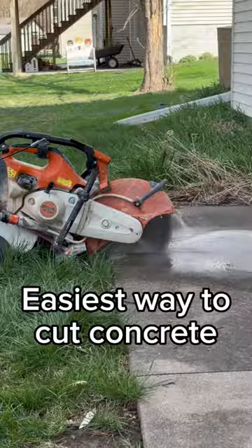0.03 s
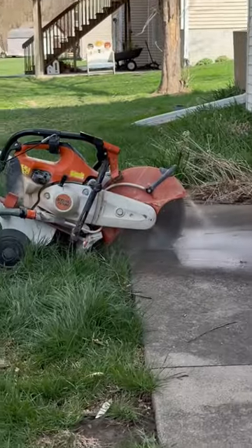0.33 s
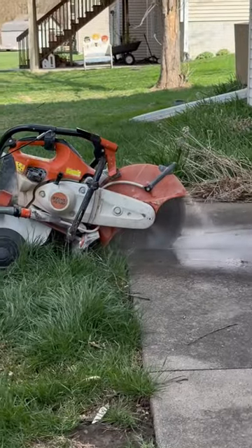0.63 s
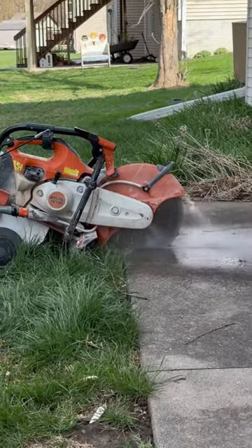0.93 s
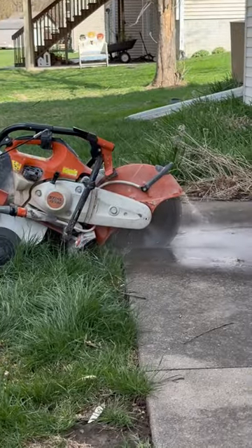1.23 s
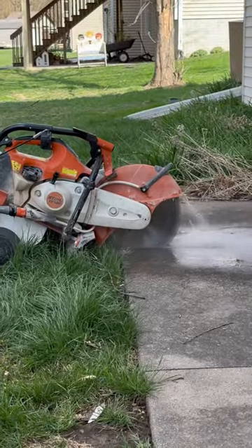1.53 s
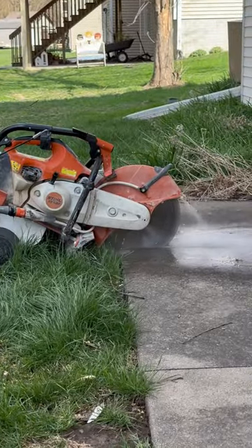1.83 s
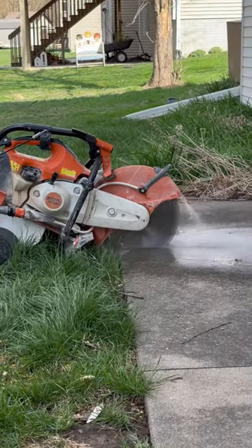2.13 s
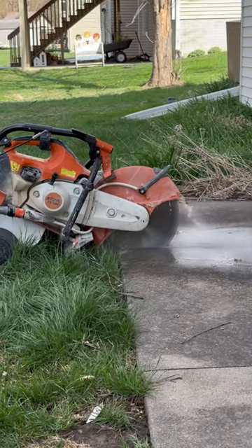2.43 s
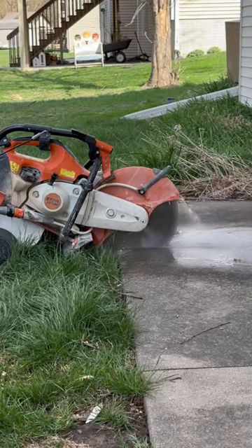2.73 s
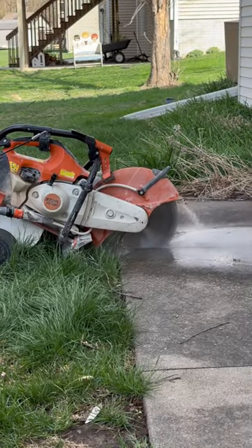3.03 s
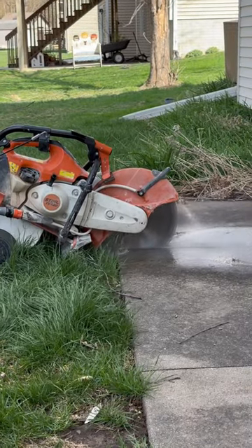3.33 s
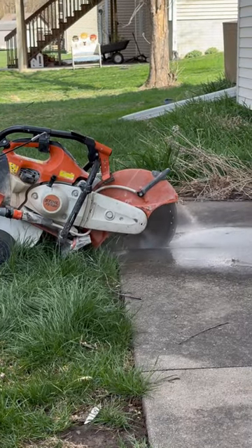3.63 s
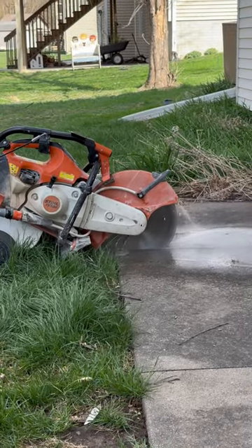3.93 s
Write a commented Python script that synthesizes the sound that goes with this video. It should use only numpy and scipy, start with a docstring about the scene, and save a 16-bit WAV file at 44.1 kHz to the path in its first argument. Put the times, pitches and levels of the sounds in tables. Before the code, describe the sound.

Close by, a buzzing petrol saw cuts concrete with a shrill metallic whistle and hissing water.

```python
"""A petrol cut-off saw cuts a wet concrete path at full throttle, outdoors and close by.
From the start the two-stroke engine buzzes and rasps, the blade grinds through the stone, its steel
disc rings, and water and slurry hiss off it. After about a second the blade bites harder: the disc
squeals and the engine sags a little. Later a whistle from the rubbing disc grows stronger.
A light wind nudges the microphone, hardest near the end."""
import sys
import numpy as np
from scipy import signal
from scipy.fft import rfft, irfft
from scipy.io import wavfile
from scipy.ndimage import uniform_filter1d

SR = 44100
rng = np.random.default_rng(int(sys.argv[2]) if len(sys.argv) > 2 else 0)


def output_pcm(signal):
    """Save a mono or channel-first signal as 16-bit PCM at the path in sys.argv[1].

    Samples are clipped to [-1, 1] before scaling.
    """
    pcm = np.clip(np.atleast_2d(signal).T, -1, 1) * 32767
    wavfile.write(sys.argv[1], SR, np.round(pcm).astype(np.int16))


N = 176400
T = np.arange(N) / SR
HZ = np.fft.rfftfreq(N, 1 / SR)


def engine_buzz(firing_hz, turns):
    """The engine fires once a turn, making wavering tones at multiples of that rate."""
    # Engine tones; each grows or fades as the speed slides it over a resonance:
    # multiple, level_db, left_minus_right_db, change_db_per_hz
    tones = [(1, -39.5, 3, 0.5), (2, -46.5, 9, 1.5), (3, -48, 9.5, .5), (4, -41.2, 12.5, -1),
             (5, -44.2, 9, 1), (6, -43, 5, -2), (7, -50.5, 5, -1), (8, -52.5, 10, 1), (9, -48.5, 1.5, 5),
             (10, -58, 0, 8), (11, -52.5, -0.5, -5), (12, -43.7, 0, -2.5), (13, -55, 0, 9.5)]
    buzz = np.zeros((2, N))
    for multiple, level_db, side_db, db_per_hz in tones:
        tone = np.sqrt(2) * np.cos(2 * np.pi * (multiple * turns + rng.random()))
        waver_db = 0.9 * min(multiple / 4, 1) * wander(16)
        resonance_db = db_per_hz * (firing_hz - firing_hz.mean())
        pan = amp([[side_db / 2], [-side_db / 2]])
        buzz += pan * amp(level_db + waver_db + resonance_db) * tone
    return buzz


def exhaust_rasp(turns):
    """Every firing sends an uneven puff of gas through the muffler."""
    # The rasp that the muffler lets out: pitch_hz, level_db (per Hz)
    muffler = [(30, -110), (125, -80), (200, -70), (222, -69.5), (242, -66.5), (265, -70.5), (360, -72.5),
               (412, -62.5), (438, -68.5), (465, -54), (515, -62.5), (610, -57.5), (680, -54.5), (735, -63),
               (795, -62.5), (862, -57.5), (900, -67), (960, -70), (1200, -77), (1310, -63), (1420, -86),
               (1530, -70.5), (1650, -78.5), (2100, -71), (3500, -109)]
    # The exhaust lies to the left: pitch_hz, right_level_db, left_right_likeness (0 to 1)
    placement = [(150, -2, .95), (300, -6, .94), (430, -4.5, .92), (600, -11, .9), (780, -5, .92),
                 (950, -3, .88), (1300, -1.5, .9), (1700, 0, 1)]
    spread_db, decay_turns, steady_flow, makeup_share = 1.1, 0.26, 0.42, 0.53
    strength = amp(spread_db * rng.standard_normal(1000))[turns.astype(int) % 1000]
    flow = steady_flow + strength * np.exp(-(turns % 1) / decay_turns)
    gas = flow * rng.standard_normal((2, N))
    # Each puff partly makes up for the one before, which clears the rasp around each engine tone.
    puffs = np.array([side - makeup_share * np.interp(turns - 1, turns, side) for side in gas])
    rasp = colour(unit(puffs), muffler)
    left, right = stereo_spectra(rasp, over_hz(placement, column=2))
    return irfft(np.array([left, right * amp(over_hz(placement))]), N)


def blade_shake():
    """The blade chatters, rocks and scrapes in the cut; gives the swings of level in dB."""
    chatter_db = 0.16 * sway(rate_hz=14.6, looseness=0.19)
    rocking_db = 0.16 * sway(rate_hz=2.92, looseness=0.073)
    scrape_db = 0.69 * wander(20) + 0.5 * wander(230)
    return chatter_db + rocking_db + scrape_db


def rim_catches():
    """The rim catches on a hard stone or slips free for a moment; gives the change in dB."""
    # Catches (above zero) and slips (below): time_s, change_db
    catches = [(.57, 0), (.66, -0.3), (.96, 1.2), (1.34, 2.6), (1.55, -0.3), (1.86, -1.5), (1.96, 3),
               (2.35, 1), (2.75, -0.8), (3.11, 2.1), (3.52, 0), (3.8, 1)]
    return sum(change_db * swell(time_s, half_length_s=0.015) for time_s, change_db in catches)


def grinding(bite_db):
    """The blade wears the stone away: a fine rush plus the ticks of breaking grit."""
    # The sound of stone being ground: pitch_hz, level_db (per Hz)
    spectrum = [(30, -115), (300, -77.5), (1100, -71.5), (1850, -71.5), (2130, -69.5), (2600, -72.5),
                (3050, -67), (4000, -67), (4850, -63.5), (5300, -69), (6100, -66), (7500, -67), (8600, -68),
                (9400, -66), (11000, -70.5), (16000, -81)]
    chips_per_s, chip_db = 700, -11.5
    breaks = rng.random(N) < chips_per_s / SR
    sizes = amp(np.minimum(rng.exponential(1, N), 4))
    rush = rng.standard_normal((2, N))
    ticks = unit(breaks * sizes * rng.choice([-1, 1], (2, N)))
    return colour(unit(rush + amp(chip_db) * ticks) * amp(bite_db), spectrum)


def disc_ringing(bite_db):
    """Rubbing keeps the steel disc ringing, louder the harder it bites."""
    # The disc's own notes, which change as the cut deepens:
    # pitch_hz, width_hz, level_db (halfway through), change_db_per_s
    notes = [(2540, 30, -51, -1), (2810, 40, -48.5, 0), (2930, 40, -47, 0), (3260, 30, -40.7, -.8),
             (3422, 22, -42.8, 0), (3600, 20, -47, -.5), (3740, 45, -46.5, 0), (3930, 50, -45.5, 0),
             (3992, 28, -40.8, .6), (4065, 40, -47.5, 0), (4370, 30, -43, -.4), (5810, 24, -43, -.7),
             (5945, 40, -42.5, -.6), (6035, 40, -41.5, -1), (6218, 22, -42, .5), (6430, 35, -42.5, .7),
             (6660, 35, -44, -1), (6873, 15, -40.5, -1.6), (7002, 20, -46.3, 0), (7120, 45, -39.3, .2),
             (7398, 14, -42.5, -2), (7635, 20, -38.3, -1.5), (7690, 30, -40, -.7), (7840, 25, -46, -.6),
             (8000, 25, -47, 0), (8175, 30, -40.3, -.3), (8370, 30, -46, 1.2), (9190, 50, -46, 0)]
    pressure_db = 1.32 * bite_db
    return sum(disc_note(pitch_hz, width_hz, steadiness=0.13)
               * amp(level_db + db_per_s * (T - T.mean()) + pressure_db)
               for pitch_hz, width_hz, level_db, db_per_s in notes)


def disc_whistle(shake_db):
    """Two close notes sing as the side of the disc rubs in the slot."""
    # The pair of disc notes: pitch_hz, width_hz, level_db
    notes = [(5024, 12, -33.3), (5131, 26, -36.3)]
    # The whistle sings out later in the cut: time_s, change_db
    loudness = [(.1, -5), (1.2, -2.3), (1.75, 0), (2.0, -1), (2.55, -0.5), (2.9, 2), (3.4, 2.5), (4.0, 2)]
    whistle = sum(amp(level_db) * disc_note(pitch_hz, width_hz, steadiness=0.21)
                  for pitch_hz, width_hz, level_db in notes)
    return whistle * amp(curve(loudness) + shake_db)


def disc_squeal(shake_db):
    """One note of the disc flares up when the rim jams."""
    # The squeal between its flares: time_s, change_db
    loudness = [(.1, -3), (.7, -2), (1.1, 2), (1.65, 2), (2.1, -1.5), (2.8, -2), (3.5, -1.5), (4.0, -1.5)]
    squeal = disc_note(pitch_hz=4516, width_hz=28, steadiness=0.19)
    return squeal * amp(-35 + curve(loudness) + 1.3 * shake_db)


def disc_note(pitch_hz, width_hz, steadiness):
    """One note of the rubbed disc: a narrow band of noise, as two unrelated signals."""
    skirt_widths, even_share, even_s = 1.86, 0.51, 0.056
    off_pitch = 2 * (HZ - pitch_hz) / width_hz
    band = rfft(rng.standard_normal((2, N))) / (1 + 1j * off_pitch)
    band /= 1 + 1j * off_pitch / skirt_widths  # falls off steeply far from the pitch
    ring = np.fft.ifft(band, N)  # complex, so abs() gives its level at each moment
    # Steady pressure evens out the slow swings of level, steady rubbing the quick ones too.
    ring /= uniform_filter1d(abs(ring), int(even_s * SR) + 1) ** even_share
    note = ring.real / (abs(ring) + 1e-12) ** steadiness
    flutter_db = 2.7 * min(pitch_hz / 7000, 1) ** 4 * wander(14)  # high notes flutter most
    return unit(note * amp(flutter_db)) * amp(jam_flares(pitch_hz))


def jam_flares(note_hz):
    """The disc jams briefly in the slot; gives the dB by which this note flares up."""
    # Flares, each lifting the notes near its pitch: time_s, pitch_hz, half_length_s, rise_db
    flares = [(.41, 3995, .025, 6), (.59, 3260, .025, 4), (.66, 7650, .025, 5), (.72, 4514, .025, 6.5),
              (.78, 3260, .03, 4.5), (.79, 5990, .03, 4.5), (.9, 3260, .03, 5), (.97, 4514, .028, 5.5),
              (1.06, 3260, .04, 7), (1.09, 4514, .032, 8), (1.14, 5990, .03, 5), (1.2, 7650, .12, 2.5),
              (1.2, 4514, .022, 7), (1.32, 4514, .045, 5), (1.33, 7398, .035, 4), (1.42, 4514, .03, 3.5),
              (1.5, 6873, .07, 6), (1.69, 4514, .035, 4), (1.77, 3995, .04, 4.5), (1.83, 5075, .1, 3),
              (1.97, 4514, .025, 4.5), (2.09, 5075, .04, 4), (2.25, 4514, .025, 6), (2.35, 3260, .06, 7),
              (2.36, 4514, .025, 6), (2.62, 5075, .04, 7.5), (2.74, 3995, .03, 6), (2.85, 5075, .05, 3.5),
              (3.03, 5075, .05, 4), (3.17, 5075, .05, 3), (3.06, 4514, .03, 5), (3.25, 3995, .04, 6),
              (3.41, 4514, .04, 6.5), (3.5, 4514, .03, 5), (3.51, 3260, .028, 7), (3.51, 3995, .028, 6),
              (3.68, 3995, .03, 7), (3.73, 7120, .025, 5), (3.77, 5075, .025, 4), (3.85, 4514, .04, 6),
              (3.9, 3995, .03, 6.5)]
    reach_hz = 90
    return sum(rise_db * swell(time_s, half_length_s)
               for time_s, pitch_hz, half_length_s, rise_db in flares
               if abs(note_hz - pitch_hz) < reach_hz)


def water_spray(bite_db):
    """Water and slurry fly off the rim in hissing spurts."""
    # The hiss of the spray: pitch_hz, level_db (per Hz)
    spectrum = [(3000, -92), (8000, -65.5), (9400, -69), (9850, -66), (10650, -63), (11200, -67.5),
                (13800, -105), (14450, -66.5), (15100, -64), (15700, -75)]
    hiss = rng.standard_normal((2, N))
    flicker_db = 1.07 * wander(70)
    return colour(hiss * amp(0.47 * bite_db + flicker_db), spectrum)


def weak_resonances(sound):
    """Countless weak resonances of disc and guard lift some pitches and lower others."""
    spread_db, spacing_hz = 2.7, 69.06
    heights_db = spread_db * rng.standard_normal(2000)
    ripple_db = np.interp(HZ / spacing_hz, np.arange(len(heights_db)), heights_db)
    return irfft(rfft(sound) * amp(ripple_db), N)


def microphone_ports(pair):
    """The microphone's two openings hear the high pitches of the cut out of step."""
    # How the openings differ: pitch_hz, left_lead_half_cycles, left_right_likeness (0 to 1)
    ports = [(100, 0, 1), (4300, 0, 1), (4600, -.03, .96), (4850, -.2, .85), (4950, -.8, .55),
             (5030, -1.42, .85), (5130, -1.66, .9), (5230, -2, 1), (6500, -2, 1), (7200, -2.07, .92),
             (8000, -2.31, .8), (10700, -2.75, .8), (11150, -3, 1), (14000, -3, 1), (14500, -3.12, .88),
             (15700, -3.36, .72)]
    left, right = stereo_spectra(pair, over_hz(ports, column=2))
    phase_shift = np.exp(-1j * np.pi * over_hz(ports))
    return irfft(np.array([left, right * phase_shift]), N)


def wind():
    """Wind on the microphone makes a lumpy low rumble with a few gusts."""
    # The rumble of the breeze: pitch_hz, level_db (per Hz)
    spectrum = [(15, -108), (35, -92), (60, -81), (85, -85.5), (130, -92), (250, -102), (1000, -160)]
    # Gusts above the breeze: time_s, half_length_s, rise_db
    gusts = [(.16, .025, 14), (.38, .025, 18), (.52, .025, 15), (3.37, .04, 12), (3.546, 0.04, 26),
             (3.623, 0.04, 16), (3.74, .03, 14), (3.88, .025, 9)]
    gust_db = sum(rise_db * swell(time_s, half_length_s) for time_s, half_length_s, rise_db in gusts)
    return colour(rng.standard_normal(N), spectrum) * amp(gust_db + wander(9))


def amp(db):
    """Turns decibels into a number to multiply by."""
    return 10 ** (np.asarray(db) / 20)


def unit(sound):
    """Scales a sound to an average size (rms) of 1."""
    return sound / np.sqrt(np.mean(sound ** 2) + 1e-20)


def curve(points):
    """Joins (time_s, value) points with straight lines."""
    return np.interp(T, *np.transpose(points))


def over_hz(points, column=1):
    """Spreads one column of a pitch table over all frequencies."""
    columns = np.transpose(points)
    return np.interp(np.log(HZ + 1), np.log(columns[0] + 1), columns[column])


def colour(noise, spectrum):
    """Shapes white noise of size 1 to a spectrum given in dB per Hz."""
    return irfft(rfft(noise) * amp(over_hz(spectrum)) * np.sqrt(SR / 2), N)


def wander(rate_hz):
    """A random drift of average size 1, up to about the given rate."""
    return unit(irfft(rfft(rng.standard_normal(N)) * (HZ > 1) / (1 + (HZ / rate_hz) ** 4), N))


def sway(rate_hz, looseness):
    """A nearly regular swing of average size 1."""
    cycles = np.cumsum(rate_hz * (1 + looseness * wander(6.5))) / SR
    return unit(np.sin(2 * np.pi * (cycles + rng.random())))


def swell(time_s, half_length_s):
    """A smooth bump of height 1."""
    return np.exp(-np.minimum(((T - time_s) / half_length_s) ** 2, 20))


def stereo_spectra(pair, likeness):
    """Blends two unrelated signals into left and right spectra; likeness 1 makes them the same."""
    left, other = rfft(pair)
    return left, likeness * left + np.sqrt(1 - likeness ** 2) * other


def scene():
    """The engine drives the blade through the wet stone while a light wind blows."""
    # Engine speed: time_s, firing_hz
    speed = [(.1, 164.9), (.4, 165.0), (.9, 163.7), (1.45, 162.9), (2.0, 163.5), (2.5, 164.2),
             (2.95, 164.8), (3.25, 164.3), (3.55, 163.1), (4.0, 162.8)]
    # How hard the blade is pressed into the cut: time_s, change_db
    pressure = [(.1, 0.5), (.3, 1), (.65, 1.26), (1.08, 1.5), (1.35, 0.5), (1.6, 1), (2.0, -1), (2.2, -0.5),
                (2.7, -0.8), (3.12, -0.3), (3.45, 0.8), (4.0, -0.4)]
    firing_hz, pressure_db = curve(speed), curve(pressure)
    turns = np.cumsum(firing_hz * (1 + 0.0011 * wander(25))) / SR
    shake_db = blade_shake()
    bite_db = pressure_db + rim_catches() + shake_db
    stone_and_water = weak_resonances(grinding(bite_db) + water_spray(bite_db))
    disc = disc_ringing(bite_db) + disc_whistle(shake_db) + disc_squeal(shake_db)
    cut = microphone_ports(stone_and_water + disc)
    buzz = engine_buzz(firing_hz, turns)
    rasp = exhaust_rasp(turns) * amp(0.82 * pressure_db)  # louder as the engine takes the load
    return buzz + rasp + cut + wind()


def record(dry):
    """Fades in quickly, then takes away the deepest rumble and the highest treble."""
    start_s, fade_s, lowest_hz, highest_hz = 0.09, 0.023, 48, 15780
    faded = dry * np.clip((T - start_s) / fade_s, 0, 1)
    low_cut = signal.butter(3, lowest_hz, "high", fs=SR, output="sos")
    high_cut = signal.firwin(801, highest_hz, window=("kaiser", 9), fs=SR)
    return signal.oaconvolve(signal.sosfilt(low_cut, faded), high_cut[None], "same")


dry = scene()
out = record(dry)
output_pcm(out)
```